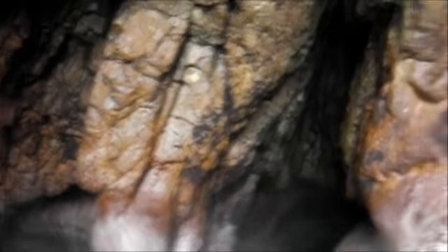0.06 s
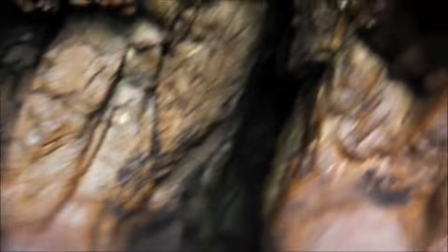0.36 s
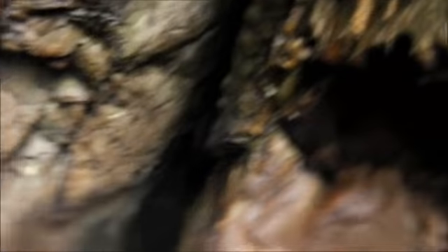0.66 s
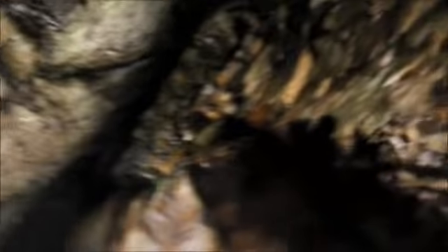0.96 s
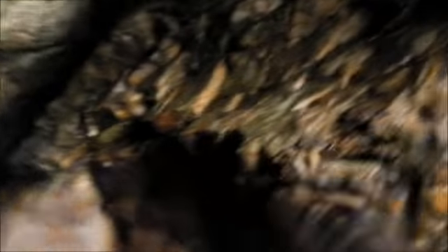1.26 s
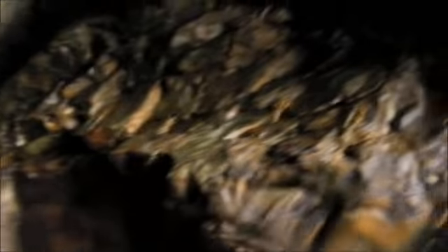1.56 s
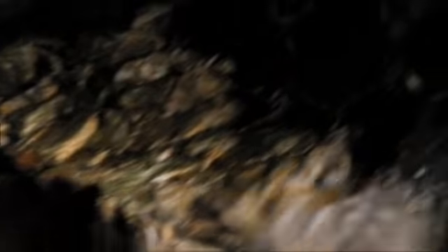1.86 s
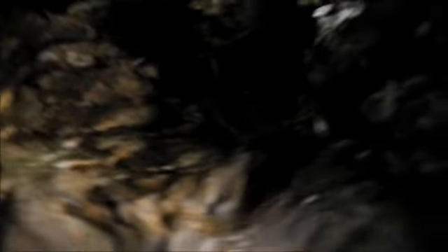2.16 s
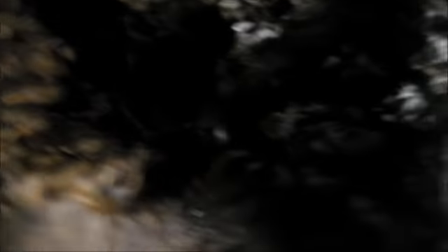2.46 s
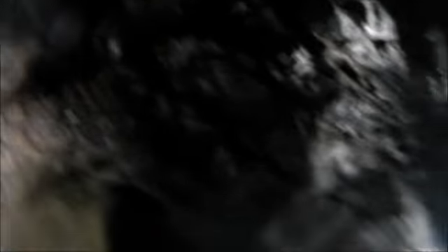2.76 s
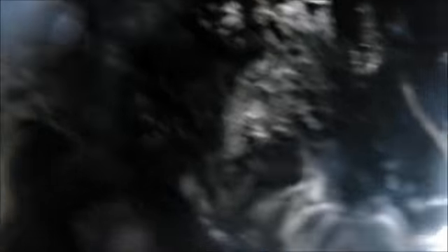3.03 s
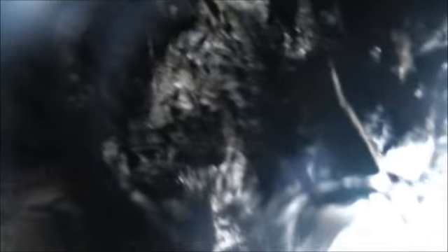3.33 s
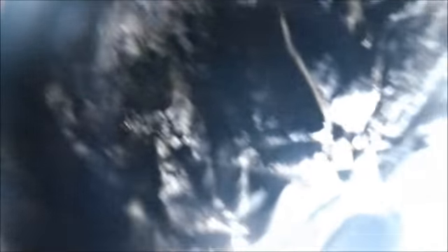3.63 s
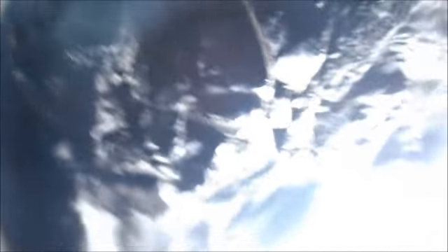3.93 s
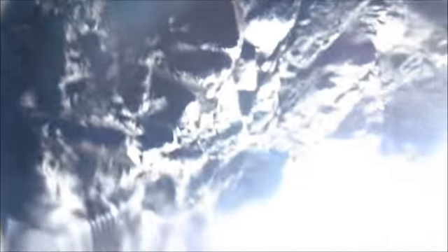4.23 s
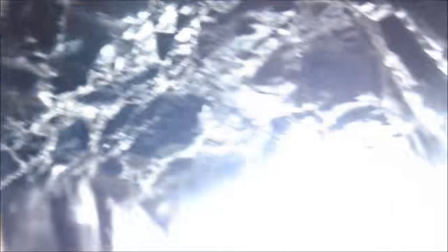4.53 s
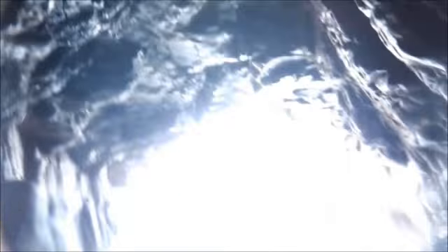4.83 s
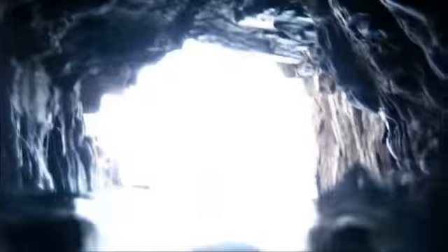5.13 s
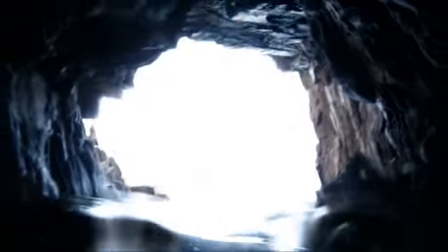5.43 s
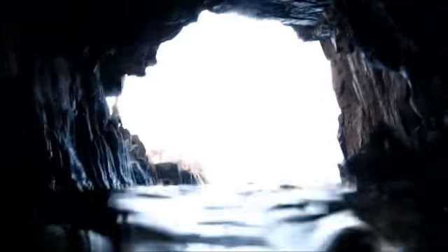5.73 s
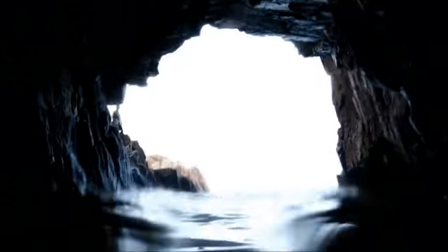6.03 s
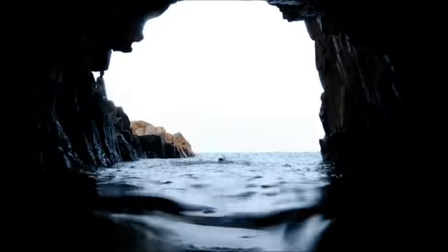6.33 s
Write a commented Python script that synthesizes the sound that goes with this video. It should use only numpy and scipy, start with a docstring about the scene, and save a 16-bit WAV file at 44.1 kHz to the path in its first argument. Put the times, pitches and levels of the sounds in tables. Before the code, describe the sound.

Sea water washes and gurgles steadily inside an echoing rock cave, heard through a sealed case just above the swell, so the treble is dull. Low buffeting, a few soft bumps and a thin hiss lie underneath. The deeper wash slowly grows. Near the end come two quick knocks on the case, the second harder, briefly dipping the water sound.

```python
"""Swell in a sea cave

Water washes and gurgles in a rock cave, heard from a camera in a sealed case just above the swell.
The case shuts out the treble; low buffeting, soft bumps and a thin hiss lie underneath.
Brief rings near 1.4 kHz sound within the rush. Two knocks hit the case, with rubbing just before
the harder one, which ducks the gain; it then recovers."""
import sys
import numpy as np
from scipy import signal
from scipy.fft import rfft, irfft, next_fast_len
from scipy.io import wavfile
from scipy.ndimage import uniform_filter1d, map_coordinates

SR = 44100
rng = np.random.default_rng(int(sys.argv[2]) if len(sys.argv) > 2 else 0)


def inscribe(sig):
    """Save sig as 16-bit PCM at rate SR to the path in sys.argv[1].

    A 1-D sig is mono; a 2-D sig holds one channel per row.
    Samples are clipped to [-1, 1] before scaling.
    """
    pcm = np.round(np.clip(np.atleast_2d(sig).T, -1, 1) * 32767)
    wavfile.write(sys.argv[1], SR, pcm.astype(np.int16))


N = 290619


def amp(db):
    """Decibels to gain."""
    return 10 ** (np.asarray(db) / 20)


def unit_rms(x):
    """x at rms 1."""
    return x / np.sqrt(np.mean(x ** 2) + 1e-20)


def along(points, hz):
    """(Hz, value) points read on a log frequency axis."""
    knots_hz, values = np.transpose(points)
    return np.interp(np.log(hz + 1), np.log(knots_hz + 1), values)


def wobble(rate_hz):
    """Smooth random curve, rate_hz knots a second."""
    knots = rng.standard_normal(int(N * rate_hz / SR) + 4)
    return map_coordinates(knots, [np.arange(N) * rate_hz / SR])


def filtered(x, response):
    """x through a complex frequency response."""
    size = next_fast_len(N + SR // 2)
    hz = np.fft.rfftfreq(size, 1 / SR)
    return irfft(rfft(x, size) * response(hz), size)[..., :N]


def add(track, start_s, sound):
    """Mix a sound into the track."""
    part = track[round(start_s * SR):][:len(sound)]
    part += sound[:len(part)]


def swing(t, hz, rise_s):
    """Resonance that swells to 1 at rise_s, then decays."""
    return np.sin(2 * np.pi * hz * t) * (t / rise_s) * np.exp(1 - t / rise_s)


def patchy_noise(depth_db):
    """Two independent noises sharing patches of random gain in time and pitch."""
    spectra = signal.stft(rng.standard_normal((2, N)), nperseg=1024)[2]
    patches = uniform_filter1d(rng.standard_normal(spectra.shape[1:]), size=5, axis=0)
    patches = uniform_filter1d(patches, size=8, axis=1)
    spectra *= amp(depth_db * unit_rms(patches))
    return unit_rms(signal.istft(spectra, nperseg=1024)[1][:, :N])


# Each row: frequency in Hz, correlation between the ports.
PORT_CORRELATION = [(40, 0.73), (80, 0.98), (280, 0.93), (400, 1), (1380, .97), (1620, 0.75), (1900, 0.89),
                    (2150, -0.077), (3500, -0.1), (6000, -0.094)]
# Each row: frequency in Hz, left over right in dB.
PORT_BALANCE_DB = [(40, -1.5), (250, -1), (350, -4.5), (1220, -3.5), (1410, 1), (1480, -1), (1590, 3.5),
                   (1720, -2.5), (4400, -0.2)]
# Each row: frequency in Hz, left phase lead in radians.
PORT_LEAD_RAD = [(200, 0.083), (1000, 0.28), (1320, 0.52), (1550, 0.46), (1660, -0.57), (1950, 0.19)]
def mic_ports(pair, spectrum_db):
    """Colour two independent signals and share them between the case's microphone ports; mono rms 1."""
    def mid_side(hz):
        angle = np.arccos(along(PORT_CORRELATION, hz)) / 2
        return amp(along(spectrum_db, hz)) * [np.cos(angle), np.sin(angle)]

    def left_right(hz):
        split = np.array([[.5], [-.5]])
        return amp(split * along(PORT_BALANCE_DB, hz)) * np.exp(1j * split * along(PORT_LEAD_RAD, hz))

    mid, side = filtered(pair, mid_side)
    stereo = filtered(np.array([mid + side, mid - side]), left_right)
    return stereo / np.std(stereo.mean(axis=0))


# Each row: frequency in Hz, echo T60 in seconds.
CAVE_T60_S = [(200, 1.44), (1000, 1.22), (4000, 0.61)]
def cave_echo(x, block=16384):
    """Echoes from the rock: treble dies first, and moving water keeps changing their paths."""
    out = np.zeros((2, N + 2 * SR))
    for start in range(0, N, block):
        hz, t, spectra = signal.stft(rng.standard_normal((2, SR * 2 // 3)), SR, nperseg=256)
        decay = amp(-60 * t / along(CAVE_T60_S, hz)[:, None])
        tail = signal.istft(spectra * decay, SR, nperseg=256)[1]
        echo = signal.fftconvolve(x[None, start:start + block], tail / np.linalg.norm(tail[0]), axes=1)
        out[:, start:start + echo.shape[1]] += echo
    return out[:, :N]


def bubbles(count, centre_hz, spread_oct, decay_cycles, size_db, echo_db):
    """Bubbles ring briefly as their pitch rises; the cave answers."""
    when, pitch, size = rng.random((count, 3)).T[:, :, None]
    t = np.arange(SR // 25) / SR
    hz = centre_hz * 2 ** (spread_oct * (2 * pitch - 1))
    age = t * hz / decay_cycles
    glide = 1 + 0.043 * np.minimum(age, 2)
    ring = np.sin(2 * np.pi * hz * t * glide) * np.exp(-age) * (1 - np.exp(-t * hz))
    ring *= amp(size_db * np.minimum(-np.log(1 - size), 4))  # many small, few large
    index = (when * N).astype(int) + np.arange(t.size)
    direct = unit_rms(np.bincount(index.ravel(), ring.ravel(), N)[:N])
    return unit_rms(np.array([direct, np.zeros(N)]) + amp(echo_db) * cave_echo(direct))


# Each row: frequency in Hz, relative density in dB.
SURF_SPECTRUM_DB = [(560, -17), (950, -16.5), (1390, 0.5), (1570, -7), (1700, -14.5), (1960, -18.5),
                    (2170, -25.5), (2390, -30), (2950, -28.5), (4500, -47.5), (5850, -87), (9900, -120)]
def surf(level_db):
    """Breaking foam: a rush of small bubbles, heard through the case's main resonance."""
    rush = patchy_noise(depth_db=0.73)
    fizz = bubbles(2800, centre_hz=1588.4, spread_oct=0.81, decay_cycles=4.05, size_db=2.5, echo_db=1.5)
    gain = amp(level_db + 0.46 + 0.51 * wobble(rate_hz=18))
    return gain * mic_ports(rush + amp(-12) * fizz, SURF_SPECTRUM_DB)


# Each row: frequency in Hz, relative density in dB.
WASH_SPECTRUM_DB = [(230, -40), (280, -19), (320, -4.5), (385, 3), (430, -2), (500, -3.5), (650, -3.5),
                    (850, 1), (1100, -3.5), (1430, -26), (2400, -58)]
def wash(level_db):
    """Water heaves along the walls with deeper, echoing gurgles."""
    rush = patchy_noise(depth_db=0.4)
    gurgle = bubbles(900, centre_hz=696.3, spread_oct=0.907, decay_cycles=5.74, size_db=2.5, echo_db=6)
    gain = amp(level_db + 0.87 * wobble(rate_hz=8.5))
    return gain * mic_ports(rush + amp(-11.5) * gurgle, WASH_SPECTRUM_DB)


# Each row: middle in seconds, sigma in seconds, centre in Hz, half width in Hz, level in dB.
CAVE_HOLLOWS = [(.25, 0.37, 447, 71, -40), (1.6, 0.25, 710, 60, -37), (1.803, 0.18, 435, 50, -39),
                (3.448, 0.23, 810, 160, -38), (4.3, 0.9, 173, 35, -47)]
def hollows():
    """Narrow bands swell and fade as the camera passes through the cave's standing waves."""
    t, track = np.arange(N) / SR, np.zeros(N)
    for middle_s, sigma_s, centre_hz, half_width_hz, db in CAVE_HOLLOWS:
        band = filtered(rng.standard_normal(N), lambda hz: np.exp(-((hz - centre_hz) / half_width_hz) ** 2))
        track += amp(db) * np.exp(-.5 * ((t - middle_s) / sigma_s) ** 2) * unit_rms(band)
    return track


# Each row: frequency in Hz, relative density in dB.
BUFFET_SPECTRUM_DB = [(12, -28), (22, -12), (46, -17), (64, -0.5), (100, 1.5), (125, 1.5), (165, -4),
                      (205, -4), (250, -26), (330, -30), (600, -80)]
def buffet(level_db):
    """Air and water push on the case in lumps."""
    gain = amp(level_db + 1.4 * wobble(rate_hz=18))
    return gain * mic_ports(rng.standard_normal((2, N)), BUFFET_SPECTRUM_DB)


# Each row: frequency in Hz, relative density in dB.
HISS_SPECTRUM_DB = [(2000, -1), (3500, 5), (4500, 1.5), (5600, 3), (7000, -0.5), (7900, -3.5), (8600, -1),
                    (15500, -4)]
# Each row: middle in seconds, boost in dB.
HISS_FLARES = [(.12, 1.5), (.96, 1), (1.33, 2), (1.77, 2), (2.16, 2.5), (2.47, 2.5), (2.8, 1), (3.24, 0.5),
               (3.8, 1.5), (4.13, 1.7), (4.41, 2.5), (4.61, 2), (5.07, 1.5), (5.5, 2), (6.3, 3)]
def hiss(base_db=-53, flare_sigma_s=0.068, correlation=0.14):
    """Thin, wide hiss that flares gently."""
    t = np.arange(N) / SR
    flare_db = sum(db * np.exp(-.5 * ((t - s) / flare_sigma_s) ** 2) for s, db in HISS_FLARES)
    white = rng.standard_normal((3, N))
    pair = np.sqrt(1 - correlation) * white[:2] + np.sqrt(correlation) * white[2]
    noise = unit_rms(filtered(pair, lambda hz: amp(along(HISS_SPECTRUM_DB, hz))))
    return amp(base_db + flare_db + 0.57 * wobble(rate_hz=15)) * noise


# Each row: start in seconds, relative level in dB.
# The last three are rubbing on the case, just before the harder knock.
CASE_RINGS = [(0.812, -17), (0.906, -17), (1.677, -15), (1.873, -12.5), (2.197, -11), (3.2127, -10.5),
              (4.707, -6.5), (4.874, -7.5), (5.623, -17), (5.6363, -11.5), (5.653, -9)]
def case_rings(noise_t60_s=0.061):
    """Brief rings of the case near 1.4 kHz within the rush of water, faint at first."""
    track, t = np.zeros(N), np.arange(SR // 8) / SR
    for start_s, db in CASE_RINGS:
        noise = rng.standard_normal(len(t)) * amp(-40 - 60 * t / noise_t60_s)
        ring = swing(t, hz=1420 * (1 + 0.04 * rng.standard_normal()), rise_s=0.0021)
        add(track, start_s, amp(db - 2.0) * (ring + noise))
    return track


# Each row: start in seconds, peak level in dB.
WATER_BUMPS = [(1.562, -35), (2.18, -37), (3.148, -24.5), (4.87, -33)]
def bumps():
    """Soft bumps of water sway the case at a low pitch."""
    track, t = np.zeros(N), np.arange(SR // 8) / SR
    for start_s, db in WATER_BUMPS:
        sway = swing(t, hz=103 * (1 + 0.18 * rng.standard_normal()), rise_s=0.011)
        add(track, start_s, amp(db) * sway)
    return track


# Each row: start in seconds, ring, air note, thud and tick gains in dB, rise and damping time in seconds.
CASE_KNOCKS = [(5.556, -17, -16.5, -10.5, -20, 0.001, 0.054), (5.662, -2.5, -2.5, -0.5, -5.5, 0.003, 0.02)]
# Each row: frequency in Hz, relative level in dB, T60 in seconds.
WALL_MODES = [(1219.5, 5, 0.033), (1332, -1, 0.017), (2280, -25, 0.0066)]
# Each row: frequency in Hz, left over right in dB. The knocks land nearer the right port.
KNOCK_BALANCE_DB = [(100, -4.5), (585, -13), (1300, -6.5), (5000, -7), (10000, -4)]
def knocks(air_hz=585, tick_t60_s=0.0074):
    """A knock gives a dull tick, a short wall ring, a hollow note of the air inside and a low thud."""
    track, ticks, t = np.zeros(N), np.zeros(N), np.arange(SR // 8) / SR
    for start_s, ring_db, air_db, thud_db, tick_db, rise_s, damping_s in CASE_KNOCKS:
        contact = np.minimum(t / rise_s, 1) ** 2
        fade_s = np.maximum(t - rise_s, 0)
        ring = sum(amp(db - 60 * fade_s / t60) * np.sin(2 * np.pi * hz * t) for hz, db, t60 in WALL_MODES)
        drift_rad = 0.064 * np.cumsum(rng.standard_normal(len(t)))
        air = amp(air_db) * contact * np.sin(2 * np.pi * air_hz * t + drift_rad)
        thud = amp(thud_db) * swing(t, hz=89, rise_s=0.019)
        grip = amp(-60 * (t / damping_s) ** 2)  # the hand stops the slow motions
        add(track, start_s, amp(ring_db) * contact * ring + grip * (air + thud))
        tick = contact * rng.standard_normal(len(t)) * amp(tick_db - 60 * fade_s / tick_t60_s)
        add(ticks, start_s, tick)
    muffled = filtered(ticks, lambda hz: 1 / np.hypot(1, hz / 1500) / np.hypot(1, hz / 9000))
    split = np.array([[.5], [-.5]])
    return filtered(track + muffled, lambda hz: amp(split * along(KNOCK_BALANCE_DB, hz)))


# Each row: time in seconds, swell strength in dB.
SWELL_DB = [(0, -23.5), (.3, -28.5), (.6, -27.5), (.68, -24), (1.2, -26), (1.75, -24), (2.45, -27),
            (3, -25), (3.6, -23.5), (4.25, -23.5), (4.7, -22), (4.95, -25), (5.45, -24.5), (6.2, -21),
            (6.55, -21.5)]
def scene():
    """One swell drives surf, wash and buffeting; the other sounds lie on top."""
    t = np.arange(N) / SR
    swell_db = np.interp(t, *np.transpose(SWELL_DB))
    surge_db = swell_db - swell_db.mean()
    approach_db = 0.9262 * t  # the camera turns to the cave mouth
    water = surf(swell_db) + wash(-37 + 0.26 * surge_db + approach_db) + hollows()
    return water + buffet(-45 + 0.66 * surge_db) + hiss() + case_rings() + bumps() + knocks()


def gain_control(x, ceiling_db, recovery_db_per_s):
    """A peak over the ceiling pulls the gain down at once; it climbs back at a steady rate."""
    peak_db = 20 * np.log10(np.abs(x).max(axis=0) + 1e-9)
    over_db = np.maximum(peak_db - ceiling_db, 0)
    climb_db = recovery_db_per_s * np.arange(N) / SR
    cut_db = np.maximum.accumulate(over_db + climb_db) - climb_db
    return x * amp(-uniform_filter1d(cut_db, size=26))


def record(dry):
    """The camera's gain control, then its band limit."""
    levelled = gain_control(dry, ceiling_db=-5.5, recovery_db_per_s=36.0)
    return filtered(levelled, lambda hz: hz < 15750)


dry = scene()
out = record(dry)
inscribe(out)
```